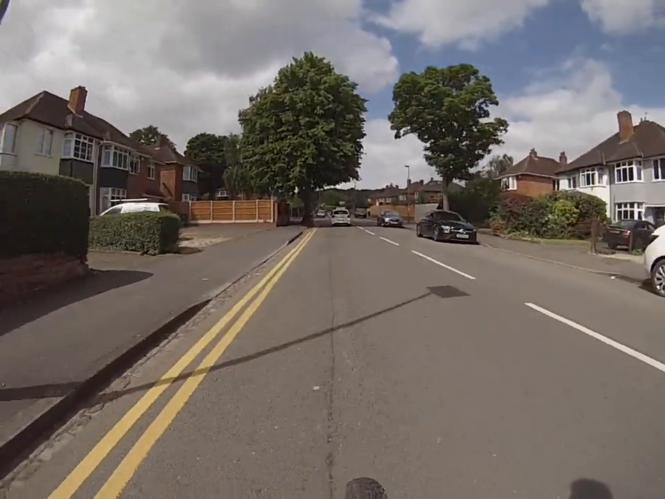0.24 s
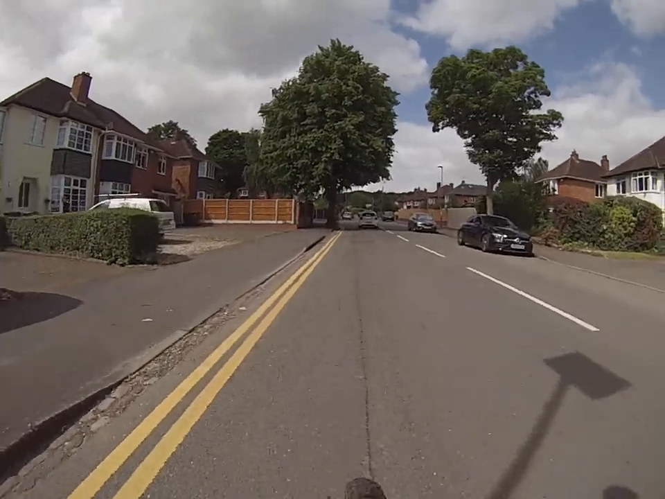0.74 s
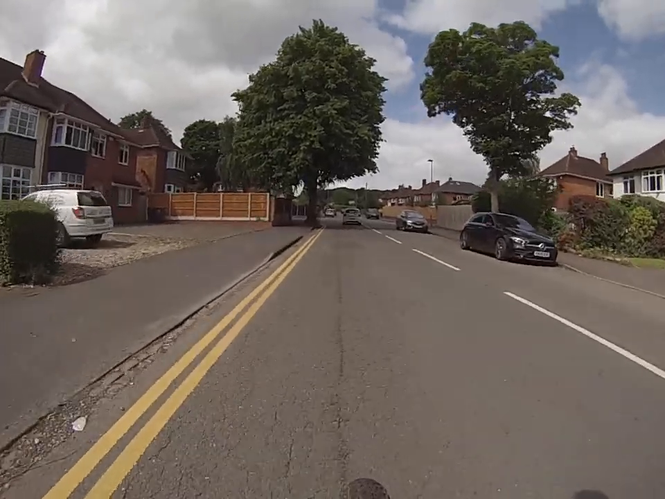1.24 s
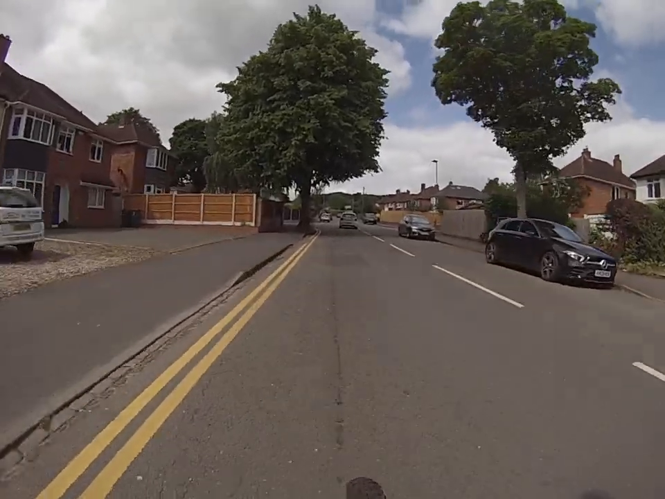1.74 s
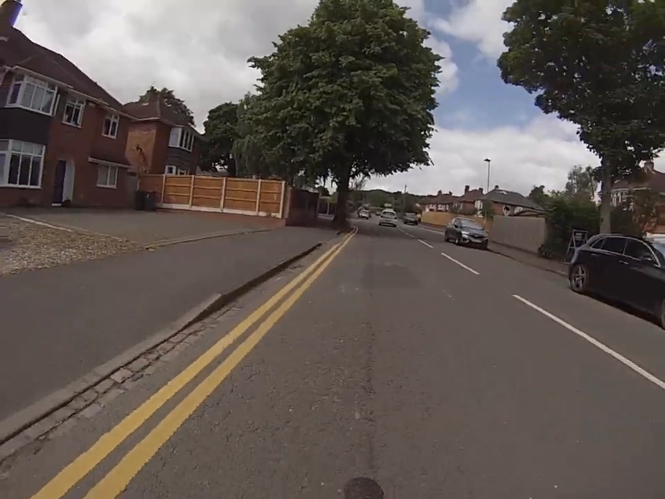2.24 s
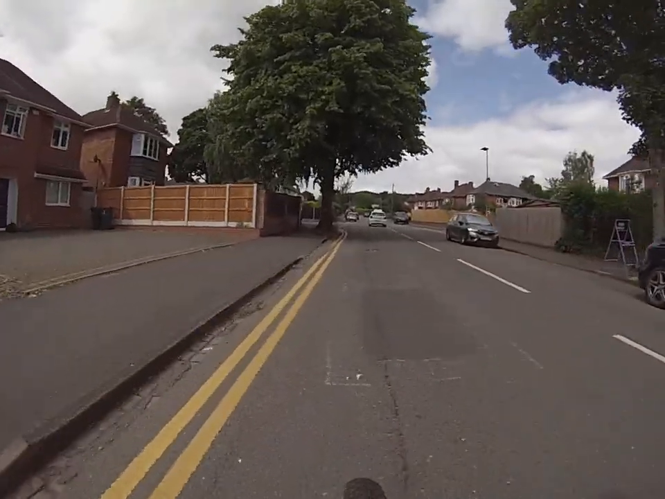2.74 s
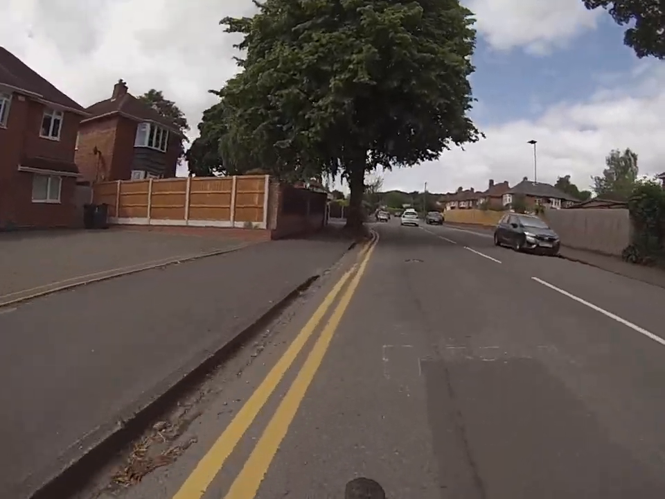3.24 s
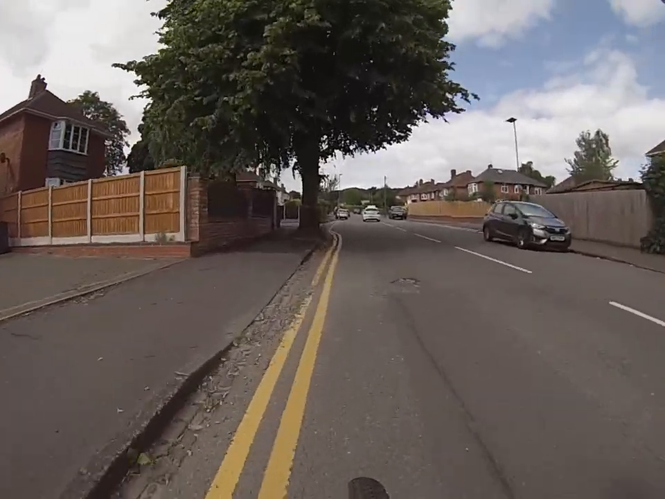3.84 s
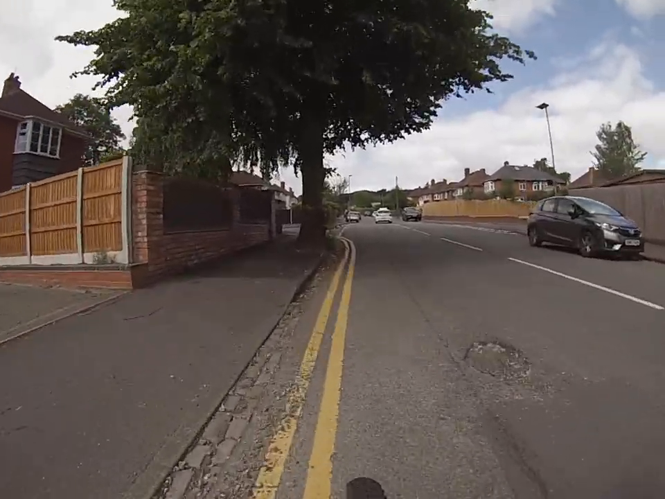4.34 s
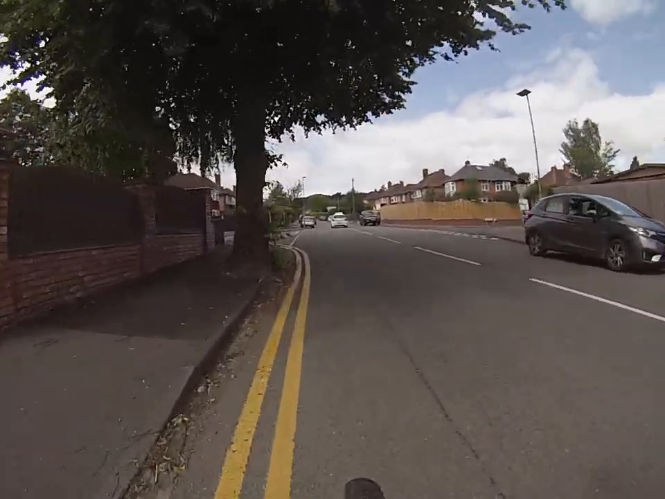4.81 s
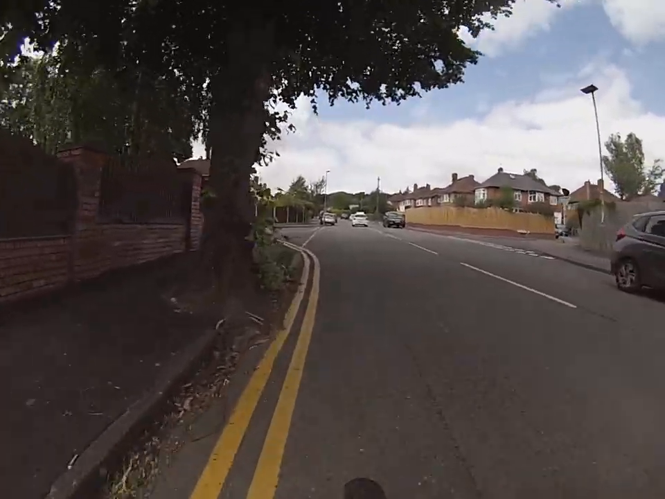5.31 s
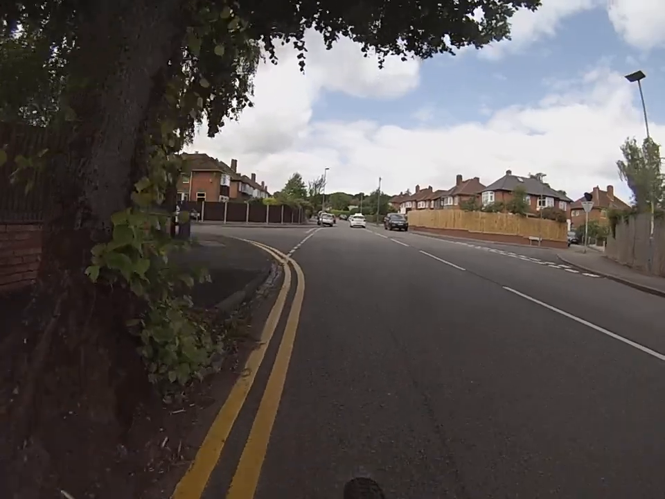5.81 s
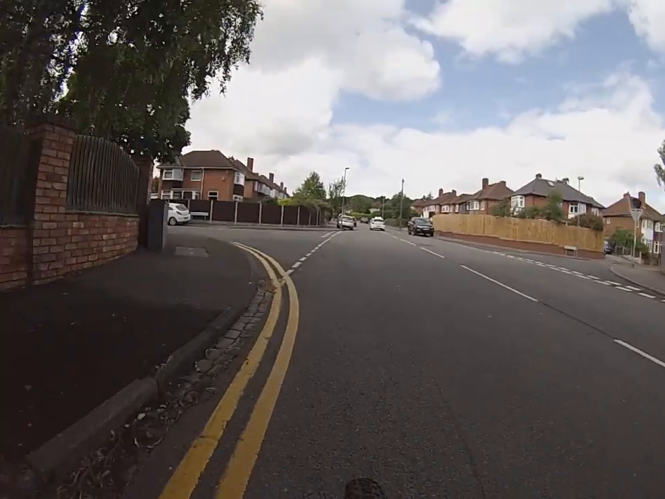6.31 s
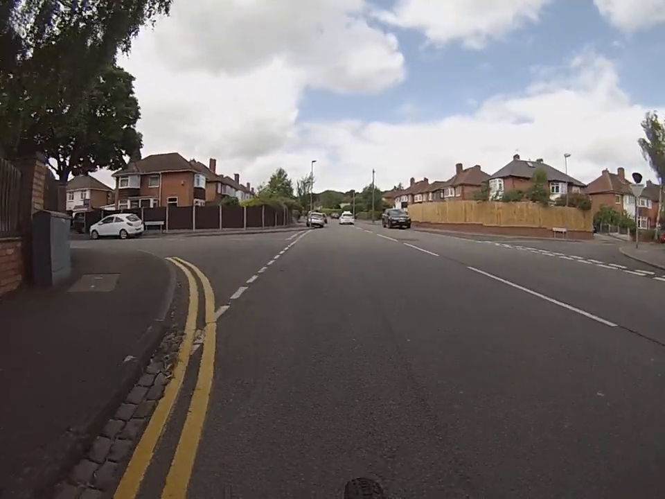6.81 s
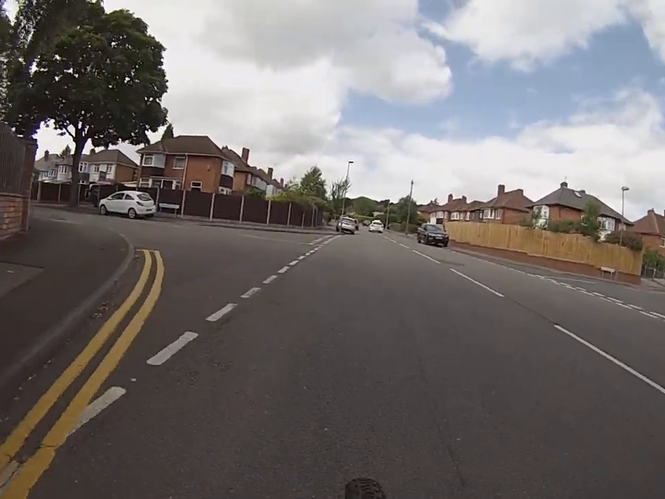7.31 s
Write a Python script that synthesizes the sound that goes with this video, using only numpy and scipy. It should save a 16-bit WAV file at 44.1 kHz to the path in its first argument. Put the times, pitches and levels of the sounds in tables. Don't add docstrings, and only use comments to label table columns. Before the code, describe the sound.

A bicycle rolls along a residential road with a low throbbing hum, muffled tyre roar and wind, quick runs of rattling, then hard knocks at the end.

```python
import sys
import numpy as np
from scipy import signal
from scipy.fft import rfft, irfft
from scipy.io import wavfile
from scipy.ndimage import uniform_filter1d

SR = 44100
rng = np.random.default_rng(int(sys.argv[2]) if len(sys.argv) > 2 else 0)


def gain_from_db(level_db):
    decades = np.asarray(level_db, float) / 20
    return 10 ** decades


def dump(signal):
    limited = np.clip(np.atleast_2d(signal).T, -1, 1)
    pcm = np.round(limited * 32767).astype(np.int16)
    wavfile.write(sys.argv[1], SR, pcm)


N = 333396

# t/s, roar/dB, frame hum level/dB, hum f/Hz
ROAD_COURSE = [(0.0, -29, -22, 280.9), (0.88, -28, -21, 282.3), (0.93, -29, -24.5, 268.1),
               (1.73, -32, -24, 274.8), (2.86, -35, -29.5, 258.9), (3.01, -36, -28, 277.8),
               (3.14, -34.5, -23, 256.8), (3.24, -33, -27.5, 274.0), (3.79, -33, -30.5, 258.5),
               (4.02, -33, -31, 267.4), (4.67, -35, -27, 257.0), (4.93, -33.5, -29.5, 273.8),
               (5.07, -33, -28, 261.4), (5.37, -33.5, -27.5, 277.6), (6.3, -31.5, -27.5, 261.4),
               (6.36, -33, -23, 267.1), (7.45, -31.5, -25.5, 266.4), (7.56, -30, -17.5, 261.1)]
# f/Hz, width/Hz, level/dB
HOUSING_MODES = [(1483, 120, -6.5), (1693, 220, -2.5), (1940, 160, -1.5), (2096, 230, 3), (2800, 300, -8),
                 (2370, 280, -0.5), (2970, 200, -1.5), (3303, 280, -9.5), (4250, 99, -16.5),
                 (4560, 170, -21.5), (4810, 180, -21.5), (5500, 300, -13.5), (5960, 230, -20),
                 (6370, 260, -17.5), (6820, 75, -26), (7050, 110, -31.5), (8100, 390, -23),
                 (8670, 230, -31.5), (11200, 2700, -50), (14100, 2000, -51)]
# t/s, then peak level/dB of lowest, main, middle, upper resonances
CLEAR_LANDINGS = [(1.3468, -29.5, -24.5, -25, -35), (1.3968, -23.5, -19, -26, -34),
                  (1.5785, -32.5, -26.5, -34, -46), (1.6317, -26, -20.5, -28, -39),
                  (1.6823, -30.5, -17.5, -22, -31.5), (1.733, -25, -17.5, -25.5, -34),
                  (2.168, -31.5, -28, -33, -46), (2.4371, -34.5, -30, -34.5, -52),
                  (2.486, -33, -27, -30, -41), (2.5359, -34.5, -22, -26, -34.5),
                  (2.5874, -39.5, -25.5, -31, -39), (2.7084, -33.5, -34, -33.5, -48),
                  (2.7583, -31, -24.5, -26, -36.5), (2.7994, -26.5, -32, -31, -52),
                  (2.8113, -27.5, -17.5, -25, -31.5), (2.8622, -20.5, -18, -22.5, -31),
                  (3.9739, -30, -25.5, -26.5, -39), (4.0238, -19.5, -16.5, -23.5, -29.5),
                  (4.0754, -23, -19.5, -25, -33), (4.1244, -26, -20.5, -25.5, -32.5),
                  (4.1699, -34.5, -21, -26, -36.5), (4.2197, -22.5, -18.5, -19, -28),
                  (4.269, -21, -15, -21, -29), (4.321, -28.5, -20, -26.5, -37)]
# t/s, then peak level/dB of lowest, main, middle, upper resonances
LATER_LANDINGS = [(5.0783, -39, -30.5, -31.5, -50), (5.6414, -42, -33, -31, -55),
                  (5.688, -27.5, -24, -25.5, -36.5), (5.7359, -21.5, -17.5, -22, -30),
                  (5.786, -20.5, -18.5, -21, -30.5), (5.8333, -23, -19, -25.5, -32.5),
                  (5.8845, -30.5, -20.5, -24.5, -35.5), (5.996, -30, -25, -29.5, -52),
                  (6.0512, -29, -24.5, -32.5, -45.5), (6.2087, -37.5, -25, -26, -40.5),
                  (6.257, -26, -21, -27.5, -35.5), (6.307, -31, -26.5, -27.5, -40.5),
                  (7.175, -14, -19.5, -10, -16), (7.2937, -40.5, -28, -37.5, -50),
                  (7.35, -28.5, -36.5, -30.5, -40.5), (7.3556, -9.5, -12.5, -15, -36)]


def evened(x):
    return x / np.sqrt(np.mean(abs(x) ** 2) + 1e-20)


def curves(rows):
    s, *columns = np.transpose(rows)
    return [np.interp(np.arange(N) / SR, s, c) for c in columns]


def add(mix, s, sound):
    part = mix[round(s * SR):][:len(sound)]
    part += sound[:len(part)]


def drift(rate_hz):
    t = np.arange(0, N, 64) / SR
    rates_hz = np.geomspace(rate_hz / 10, rate_hz, num=20)
    slow = sum(np.sin(2 * np.pi * (f * t + rng.random())) / np.sqrt(f) for f in rates_hz)
    return np.interp(np.arange(N) / SR, t, evened(slow))


def dips(rows, after=0.91):
    t = np.arange(N) / SR
    return sum(db * np.maximum(1 - np.maximum(s - t, (t - s) / after) / half, 0) for s, db, half in rows)


def read(points, hz):
    f, db = np.transpose(points)
    return gain_from_db(2 * np.interp(np.log(hz), np.log(f), db))


def peaks(modes, hz):
    return sum(gain_from_db(2 * db) / (1 + (2 * (hz - f) / width) ** 2) ** 2 for f, width, db in modes)


def coloured(power_of):
    white = rfft(rng.standard_normal(N))
    return irfft(white * np.sqrt(power_of(np.fft.rfftfreq(N, 1 / SR) + 1) * SR / 2), N)


def patchy(x, patch_db):
    z = signal.stft(x, SR, nperseg=512)[2]
    chance = rng.standard_normal(z.T.shape).T
    patches = uniform_filter1d(uniform_filter1d(chance, size=5, axis=0), size=12, axis=1)
    return signal.istft(z * gain_from_db(patch_db * evened(patches)), SR, nperseg=512)[1][:N]


def shaken(hz, width_hz, steady):
    r = np.exp(-np.pi * width_hz / SR)
    z = rng.standard_normal(N + SR) + 1j * rng.standard_normal(N + SR)
    z = signal.lfilter([1], [1, -r], signal.lfilter([1], [1, -r], z))
    z = evened(z[SR:])
    z = z / (abs(z) + 0.29) ** np.clip(steady, 0, 1)
    carrier = np.exp(2j * np.pi * np.cumsum(hz * np.ones(N)) / SR)
    return evened((z * carrier).real)


def ring(modes):
    log_gain = .5 * np.log(peaks(modes, abs(np.fft.fftfreq(8192, 1 / SR))) + 1e-10)
    minimum_phase = -signal.hilbert(log_gain).imag
    response = np.fft.ifft(np.exp(log_gain + 1j * minimum_phase)).real[:2048]
    return response / np.linalg.norm(response)


def housing(low_hz, high_hz):
    return ring([m for m in HOUSING_MODES if low_hz <= m[0] < high_hz])


def struck(response, blow):
    sound = np.convolve(response, blow)
    return sound / abs(sound).max()


def coarseness_db():
    usual_road_db = -32
    return curves(ROAD_COURSE)[0] - usual_road_db


def wind():
    # t/s, level/dB
    buffeting = [(0.0, -43.5), (0.06, -36), (1.77, -26), (2.21, -35), (2.25, -25), (2.32, -32), (2.88, -25),
                 (3.35, -31.5), (3.43, -23), (3.68, -24), (3.73, -36.5), (3.81, -25), (4.86, -30.5),
                 (5.12, -25.5), (5.14, -36), (5.45, -25.5), (7.35, -29.5), (7.56, -37)]
    # f/Hz, level/dB per Hz
    gust_colour = [(15, 20.5), (35, 12.5), (85, 19.5), (115, 12), (141, 9.5), (170, 9), (230, -0.5),
                   (320, -60)]
    level_db = curves(buffeting)[0] + 5.0 + 1.0 * drift(25)
    return gain_from_db(level_db) * evened(coloured(lambda hz: read(gust_colour, hz)))


def drone():
    hold_s, fade_db_per_s = 0.71, 61.5
    level_db = -29.5 - fade_db_per_s * np.maximum(np.arange(N) / SR - hold_s, 0)
    return gain_from_db(level_db) * shaken(138.3, width_hz=7.8, steady=0.58)


def fizz():
    # f/Hz, level/dB per Hz
    fizz_colour = [(3200, -40.5), (3900, -10.5), (4300, -4), (4750, -3), (5100, -7), (5480, -0.5),
                   (5950, -9), (6350, -5.5), (6800, -11.5), (7500, -14.5), (8050, -8.5), (8600, -15.5),
                   (9200, -17.5), (10300, -24), (11100, -9.5), (12500, -27.5), (15500, -39.5), (16000, -64)]
    level_db = -73.5 + coarseness_db() + 1.9 * drift(150) + 1.2 * drift(5.1)
    return gain_from_db(level_db) * evened(coloured(lambda hz: read(fizz_colour, hz)))


def roar():
    # f/Hz, level/dB per Hz
    broad_colour = [(20, -20.5), (150, -11.5), (300, -37), (400, -20.5), (700, -23.5), (1150, -26.5),
                    (1320, -36), (2400, -46), (3400, -76.5), (3900, -68), (5000, -92), (7000, -130)]
    # f/Hz, width/Hz, level/dB over the roar
    frame_modes = [(340, 42, 0.5), (520, 50, -3), (590, 60, -7), (790, 70, -8), (885, 60, -5),
                   (1050, 120, -6), (1580, 200, -16), (2150, 300, -20), (2580, 200, -28), (2950, 400, -30),
                   (3400, 300, -36)]
    broad_db = -5.5

    def power(hz):
        modes = sum(peaks([mode], hz) / mode[1] for mode in frame_modes)
        return read(broad_colour, hz) * gain_from_db(2 * broad_db) + modes

    grit_db = 1.0 * drift(60) + .5 * drift(3.3)
    level_db = curves(ROAD_COURSE)[0] - 4.5 + grit_db
    return gain_from_db(level_db) * patchy(coloured(power), patch_db=2.0)


def tubes():
    # f/Hz, width/Hz, level/dB re hum
    tube_modes = [(533, 34, -24.5), (875, 56, -24.5)]
    hum_db = curves(ROAD_COURSE)[1]
    out = np.zeros(N)
    for hz, width_hz, db in tube_modes:
        out += gain_from_db(hum_db + db + 2.0 * drift(8)) * shaken(hz, width_hz, steady=0.22)
    return out


def sway():
    # t/s, mount f/Hz, level/dB
    sway_course = [(0, 64.1, -20), (.6, 63.81, -5.5), (.8, 64.02, -13), (1.1, 58.64, -11),
                   (1.5, 59.33, -10), (1.95, 61.89, -14), (2.35, 57.22, -7.5), (3.12, 57.38, -10.5),
                   (3.5, 60.03, -9.5), (3.8, 57.75, -10.5), (4.15, 62.17, -9), (4.4, 59.66, -7),
                   (4.7, 59.81, -11.5), (5.25, 58.2, -9.5), (5.6, 55.37, -10.5), (6, 60.5, -11),
                   (6.35, 57.34, -9), (7.56, 62.4, -12)]
    # t/s, depth/dB,
    # half length/s
    sway_lulls = [(0.044, -2.5, 0.045), (0.255, 12, 0.028), (.4, 0.5, 0.11), (0.514, 14.5, .06),
                  (.6, 7, .06), (1.27, -4, 0.074), (0.698, 21, 0.066), (1.132, 14.5, .06),
                  (1.914, 9, 0.074), (2.045, 19, 0.036), (2.231, 23, 0.045), (2.44, 15.5, 0.039),
                  (2.52, 22, .045), (2.846, 17.5, 0.067), (3.191, 5.5, 0.078), (3.344, 14.5, 0.068),
                  (3.582, 21, 0.042), (3.92, 12.5, 0.036), (4.255, 16, 0.045), (4.933, 11.5, 0.057),
                  (5.115, 29.5, 0.066), (5.236, 15, 0.042), (5.502, 5, 0.21), (5.742, 14, 0.077),
                  (5.872, 10, 0.05), (6.471, 8.5, 0.064), (6.57, 14, 0.04), (6.78, 11, 0.15),
                  (6.989, 10.5, 0.045), (7.112, 17.5, 0.042), (7.211, 19.5, 0.055), (7.324, 14.5, 0.072),
                  (7.449, 17, 0.051),
                  (0.759, 14.5, 0.022), (0.845, 2, 0.047), (1.459, 3.5, 0.027), (1.548, 11.5, 0.039),
                   (2.989, 7, 0.029), (3.138, 7.5, 0.069), (3.243, 7.5, 0.022), (4.125, 12, 0.04),
                   (4.193, 10, 0.045), (4.678, 8, 0.039), (4.749, 6.5, 0.017), (5.4, 6, 0.044),
                   (5.542, 6.5, 0.02), (5.582, 7, 0.024), (5.679, 5.5, 0.02), (5.795, 8.5, 0.017),
                   (5.988, 11.5, 0.028), (6.152, 2.5, 0.046), (6.394, 6, 0.021), (6.674, 9.5, 0.032),
                   (7.277, 6, 0.024), (7.53, 6, 0.017)]
    hz, level_db = curves(sway_course)
    level_db = level_db - dips(sway_lulls, after=0.98)
    return gain_from_db(level_db) * shaken(hz, width_hz=7.5, steady=1.0)


def low_mode():
    # t/s, depth/dB, half length/s
    low_mode_lulls = [(0.289, 5.5, 0.043), (0.364, 5.5, 0.04), (0.583, 5.5, 0.047), (0.676, 4.5, 0.049),
                      (0.971, -3, 0.045), (1.184, 3, 0.086), (1.302, 1.5, 0.038), (1.538, 2.5, 0.02),
                      (1.618, 2.5, 0.062), (1.667, 6, 0.02), (1.744, 6, 0.033), (1.847, 6, 0.037),
                      (2.011, 3.5, 0.099), (2.312, 8, 0.034), (2.421, 7.5, 0.11), (2.642, 8, 0.043),
                      (2.774, 6, 0.13), (3.09, 12.5, 0.045), (3.58, 1, 0.089), (3.675, 15, 0.038),
                      (3.922, 5.5, 0.056), (4.062, 9.5, 0.037), (4.155, 10.5, 0.051), (4.214, 8.5, 0.032),
                      (4.468, 6, 0.061), (4.544, 5.5, 0.084), (4.862, 3, 0.083), (5.125, 5, 0.03),
                      (5.395, 4.5, 0.1), (5.483, 9, 0.047), (5.642, 12.5, 0.043), (5.816, 3, 0.02),
                      (5.946, 1, 0.064), (6.193, 5.5, 0.067), (6.398, 8, 0.064), (6.647, 7.5, 0.066),
                      (6.761, 6.5, 0.056), (7.069, 9, 0.11), (7.181, 3, 0.028), (7.334, 6, 0.085)]
    level_db = -24.5 + 0.19 * coarseness_db() - 0.99 * dips(low_mode_lulls)
    return gain_from_db(level_db) * shaken(208, width_hz=45.0, steady=0.37)


def hum():
    # t/s, depth/dB, half length/s
    jolt_lulls = [(0.066, 11, 0.036), (0.368, 6.5, 0.017), (0.459, 9, 0.059), (0.74, 4.5, 0.058),
                  (0.826, 9.5, 0.052), (0.934, 5, 0.047), (1.171, 9.5, 0.031), (1.252, 5.5, 0.09),
                  (1.367, 10.5, 0.045), (1.48, 9, 0.025), (1.631, 6.5, 0.019), (1.769, 5, 0.064),
                  (1.932, 4.5, 0.048), (2.048, 3.5, 0.027), (2.176, 10.5, 0.026), (2.403, 4, 0.12),
                  (2.781, 8.5, 0.078), (2.981, 15, 0.03), (3.101, 6.5, 0.092), (3.235, 3.5, 0.036),
                  (3.383, 9, 0.019), (3.559, 12.5, 0.11), (3.682, 7.5, 0.031), (3.827, 10.5, 0.059),
                  (3.991, 10, 0.026), (4.231, 2, 0.091), (4.331, 9, 0.02), (4.452, 11.5, 0.026),
                  (4.58, 9.5, 0.11), (4.631, 10, 0.078), (4.76, 8, 0.016), (4.812, 13, 0.025),
                  (4.898, 2.5, 0.047), (4.965, 12, 0.019), (5.148, 3.5, 0.07), (5.327, 13.5, 0.036),
                  (5.39, 5.5, 0.045), (5.577, 9.5, 0.033), (5.834, -1.5, 0.15), (5.984, 8, 0.024),
                  (6.048, 10, 0.028), (6.118, 10, 0.037), (6.33, 2.5, 0.17), (6.409, 5.5, 0.046),
                  (6.642, 3.5, 0.026), (6.753, 9, 0.022), (6.956, 3, 0.051), (7.236, 7, 0.041)]
    # t/s, depth/dB, half length/s
    stone_kicks = [
        (0.8, -9, .03),
        (3.161, -5.5, .03),
        (4.083, -7.5, 0.036),
        (5.049, -8, .03),
        (6.5, -5, 0.049),
    ]
    _, level_db, hz = curves(ROAD_COURSE)
    level_db = level_db + 4 - 1.16 * dips(jolt_lulls + stone_kicks) - 0.04 * drift(7.1)
    return gain_from_db(level_db) * shaken(hz, width_hz=20, steady=0.75)


def low_modes():
    lift_s, lift_db, lift_rise_s = 7.508, 15, 0.013
    lift = np.clip((np.arange(N) / SR - lift_s) / lift_rise_s, 0, 1)
    return (sway() + low_mode() + hum()) * gain_from_db(-lift_db * lift)


def ticks():
    # t/s, relative level/dB
    tick_times = [(.015, -74.5), (1.45, -68.5), (1.613, -65.5), (2.328, -67), (2.377, -71), (2.405, -71),
                  (4.4268, -60.5), (4.473, -70), (4.541, -60.5), (4.562, -70), (2.3534, -60.5),
                  (2.363, -60.5), (2.4728, -72.5), (2.654, -59), (2.6997, -59), (2.7472, -58.5),
                  (2.94, -59.5), (3.019, -62.5), (3.432, -68.5), (3.455, -72), (3.494, -59), (3.515, -70),
                  (3.9655, -58), (4.007, -59.5), (4.017, -61), (4.03, -57), (4.0591, -59), (4.376, -77.5),
                  (4.4221, -64.5), (4.435, -56), (4.4431, -64.5), (4.5062, -72.5), (4.52, -67.5),
                  (4.549, -62.5), (4.558, -66), (4.871, -84), (5.0127, -84.5), (5.2958, -59.5),
                  (6.3394, -78.5), (6.3689, -73.5)]
    t, decay = np.arange(-40, 40) / SR, np.exp(-np.arange(60) / SR / 0.00008)
    kink = np.exp(-(t / .00003) ** 2) * np.hanning(len(t))
    kink = np.convolve(kink, (1 + .5 * rng.standard_normal(60)) * decay)
    kink = signal.lfilter([.3], [1, -.75], kink)
    out = np.zeros(N)
    for (s, db), chance in zip(tick_times, rng.random((len(tick_times), 6))):
        add(out, s - 40 / SR, gain_from_db(db + 30.5) * kink)
        for offset, size in chance.reshape(3, 2):
            add(out, s + 0.023 * (offset - .5), -gain_from_db(db + 23 - 15 * size) * kink)
    return out


def buzz():
    tail_db, rise_s, tail_s = -10, 0.0023, 0.007
    kicks, t = np.zeros(N), np.arange(3000) / SR
    envelope = (1 - np.exp(-t / rise_s)) * np.exp(-t / tail_s)
    for s, low_db, main_db, mid_db, high_db in CLEAR_LANDINGS + LATER_LANDINGS:
        add(kicks, s, gain_from_db(mid_db + tail_db) * envelope)
    hiss = coloured(lambda hz: peaks(HOUSING_MODES, hz) * (hz / 2000) ** 0.79 * (hz < 7500))
    return kicks * evened(hiss)


def hits():
    # t/s, peak level/dB
    lone_hits = [(0.541, -27.5), (0.59, -29), (0.622, -25.5), (0.66, -26), (0.7407, -35), (.698, -36.5),
                 (1.036, -35.5), (1.564, -35.5), (1.988, -34), (2.2044, -32), (2.2708, -30.5),
                 (2.3402, -31), (2.383, -35.5), (2.6545, -32.5), (2.919, -39), (3.107, -29.5),
                 (3.151, -37.5), (3.161, -33), (3.477, -32.5), (5.251, -32.5), (5.471, -23), (5.531, -29.5),
                 (6.159, -35.5), (6.292, -37.5), (6.349, -33.5), (3.06, -40.5), (6.772, -32.5),
                 (6.9105, -35), (6.473, -35.5), (6.521, -36), (7.32, -25.5), (7.3575, -11.5), (7.393, -28),
                 (7.428, -32)]
    colour_db, spread_db = np.array((-7, -2.5, -7, -26)), -0.7
    chance = rng.standard_normal((len(lone_hits), 4))
    faint = [(s, *(db + colour_db + spread_db * c)) for (s, db), c in zip(lone_hits, chance)]
    return CLEAR_LANDINGS + LATER_LANDINGS + faint


def rattles():
    out, t = np.zeros(N), np.arange(500) / SR
    edges_hz = 0, 1900, 2650, 4000, 7500, SR
    groups = [housing(a, b) for a, b in zip(edges_hz[:-1], edges_hz[1:])]
    envelope = (1 - np.exp(-t / 0.00025)) * np.exp(-t / 0.0018)
    usual = rng.standard_normal(500)
    rows = hits()
    for (s, low_db, main_db, mid_db, high_db), own in zip(rows, rng.standard_normal((len(rows), 500))):
        z = rfft((0.42 * usual + own) * envelope, n=1024)
        blow = irfft(z / abs(z) ** .7)[:500] * np.exp(-t / 0.0073)
        top_db = high_db - 19 + 0.79 * (high_db + 30.5)
        levels_db = low_db, main_db + .1, mid_db - .1, high_db + .1, top_db
        add(out, s, sum(gain_from_db(d) * struck(g, blow) for d, g in zip(levels_db, groups)))
    return out


def slap():
    wall = [(2250, 220, 0), (2460, 250, -1.5), (2660, 250, -1.5)]  # f/Hz, width/Hz, level/dB
    out, t = np.zeros(N), np.arange(300) / SR
    blow = rng.standard_normal(300) * np.exp(-t / 0.0012)
    add(out, 7.1757, gain_from_db(-7.5) * struck(ring(wall), blow))
    return out


def knocks():
    # t/s, peak level/dB, blow length/s, housing level/dB
    blows = [(0.773, -12.5, 0.0035, -16), (6.483, -17.5, .003, -22), (7.323, -20, 0.0026, -5),
             (7.355, -17, 0.0065, -32), (7.486, -10, 0.0023, -24.5), (7.493, -8.5, 0.0055, -23),
             (7.495, -24, 0.0033, -8), (7.503, -18, 0.0017, -24), (7.5045, -11, 0.002, -24.5),
             (7.5234, -13, 0.0008, -30), (7.532, -1.5, 0.0015, -17.5), (7.5336, -6, .0012, -7),
             (7.535, -6, 0.002, -17.5), (7.546, -17, 0.0011, -24.5), (7.5525, -0.5, 0.00099, -19.5),
             (7.5555, -4, 0.0016, -7)]
    # f/Hz, width/Hz, level/dB
    body_modes = [(266, 20, -1), (555, 130, 3.5), (760, 280, 0.5), (900, 250, 4), (1290, 630, -5.5),
                  (1890, 550, -8), (2400, 540, -18.5), (5500, 4000, -60.5)]
    out, t = np.zeros(N), np.arange(500) / SR
    body, low, high = ring(body_modes), housing(0, 4000), housing(4000, SR)
    for (s, db, length_s, housing_db), chatter in zip(blows, rng.standard_normal((len(blows), 500))):
        blow = chatter * (1 - np.exp(-t / 0.00036)) * np.exp(-t / abs(length_s))
        shell = struck(low, blow) + gain_from_db(-27.5) * struck(high, blow)
        add(out, s, gain_from_db(db) * (struck(body, blow) + gain_from_db(housing_db) * shell))
    return out


def scene():
    background = wind() + drone() + fizz() + roar() + tubes() + low_modes()
    impacts = ticks() + buzz() + rattles() + slap() + knocks()
    return (background + impacts)[None]


def limited(x):
    level_db = 10 * np.log10(abs(uniform_filter1d(x[0] ** 2, size=300)) + 1e-12)
    fall_db = np.arange(N) * 60. / SR
    over_db = np.maximum(np.maximum.accumulate(level_db + fall_db) - fall_db + 6, 0)
    held = x / gain_from_db(.5 * uniform_filter1d(over_db, size=300))
    held = held - held.mean()
    knee, room = .6, .45
    return np.where(abs(held) < knee, held, np.sign(held) * (knee + room * np.tanh((abs(held) - knee) / room)))


def starved(x):
    # from t/s, to t/s
    open_spans = [(0.0, 0.15), (0.19, 0.38), (0.42, 0.49), (0.56, 0.78), (0.85, 1.03), (1.24, 1.35),
                  (1.39, 1.45), (1.49, 1.54), (1.66, 1.74), (1.79, 1.84), (2.05, 2.1), (2.15, 2.21),
                  (2.25, 2.61), (2.66, 2.82), (2.86, 2.89), (2.94, 2.99), (3.03, 3.12), (3.24, 3.29),
                  (3.33, 3.52), (3.63, 3.88), (3.93, 4.08), (4.12, 4.23), (4.27, 4.34), (4.37, 4.81),
                  (5.01, 5.06), (5.1, 5.21), (5.25, 5.49), (5.6, 5.64), (5.68, 5.75), (5.78, 5.86),
                  (5.93, 5.97), (6.06, 6.11), (6.16, 6.25), (6.33, 6.43), (6.68, 6.75), (6.78, 6.83),
                  (6.91, 6.96), (7.1, 7.21), (7.3, 7.37), (7.52, 7.56)]
    edges_hz, edge_hold_s = (9300, 11800, 12000, 12600, 12600, 13000), .03
    holes_from_hz, hole_hz, hole_share = 8200, 700, .14
    hz, t, z = signal.stft(x, SR, nperseg=1024, noverlap=768)
    block = np.round(t / edge_hold_s).astype(int)
    edge_hz = rng.choice(edges_hz, block[-1] + 1)[block]
    chance = rng.random((block[-1] + 1, 40))[block]
    holes = chance[:, (hz // hole_hz).astype(int)].T < hole_share
    kept = (hz[:, None] < edge_hz) & ~(holes & (hz[:, None] > holes_from_hz))
    top = abs(z[0, hz > edges_hz[-1]]).max(0)
    hit = top > np.median(top) * gain_from_db(15)
    whole = hit | np.any([(t >= a) & (t <= b) for a, b in open_spans], 0)
    return signal.istft(z * (kept | whole), SR, nperseg=1024, noverlap=768)[1][:, :N]


def low_pass(x):
    return signal.sosfilt(signal.butter(12, 15700, fs=SR, output="sos"), x)


def record(dry):
    mix = starved(limited(dry))
    return low_pass(mix)


dry = scene()
out = record(dry)
dump(out)
```